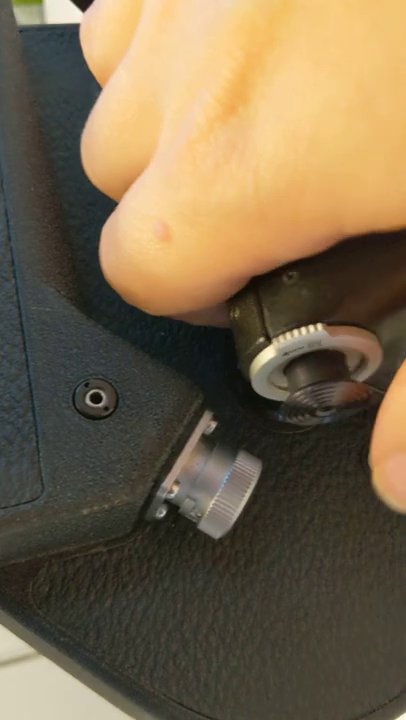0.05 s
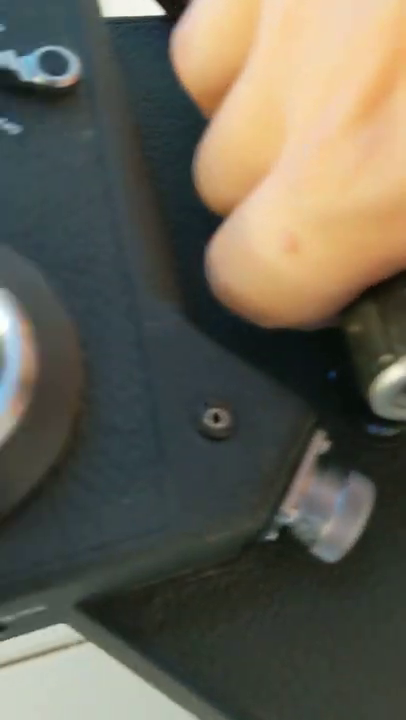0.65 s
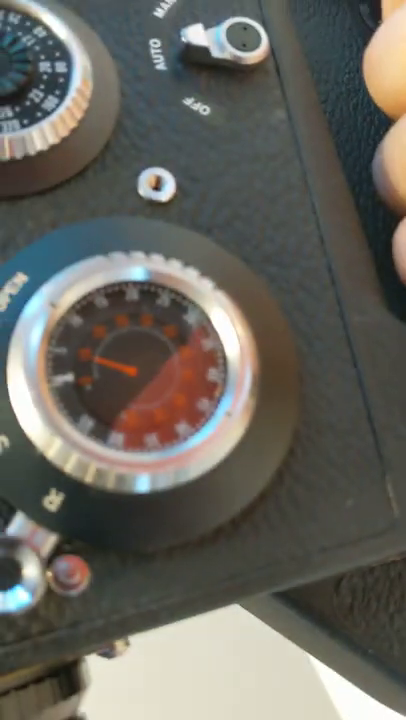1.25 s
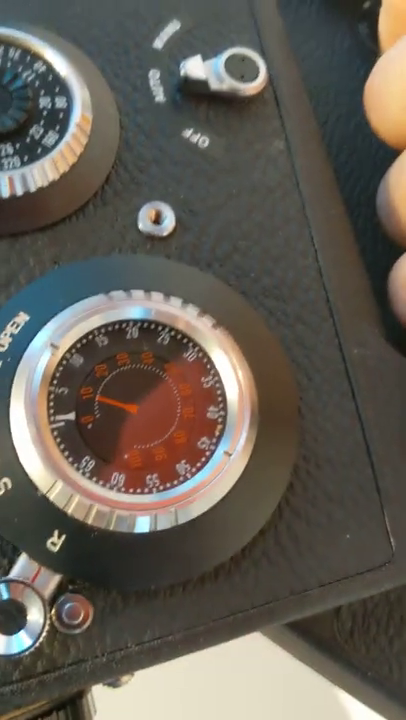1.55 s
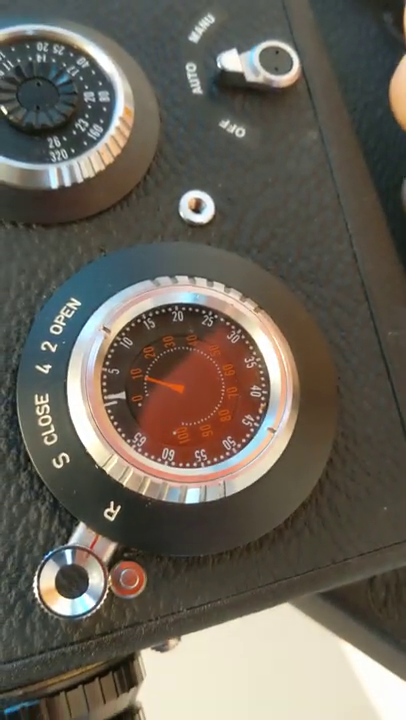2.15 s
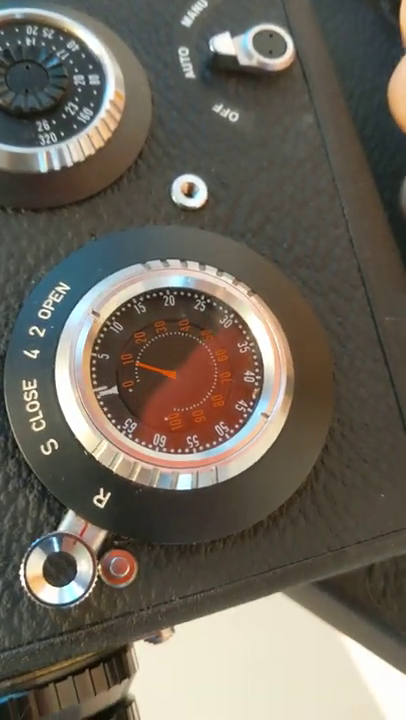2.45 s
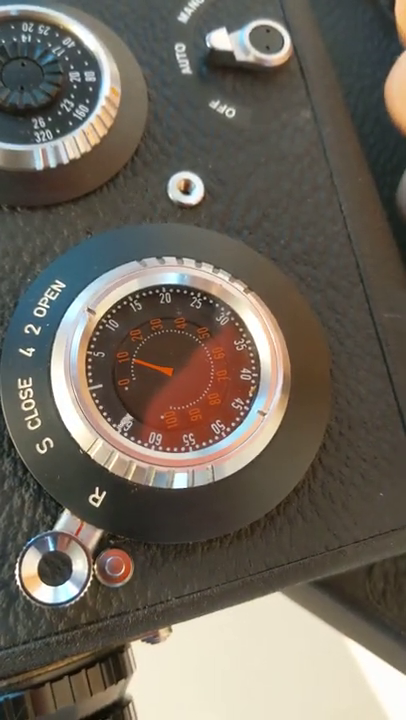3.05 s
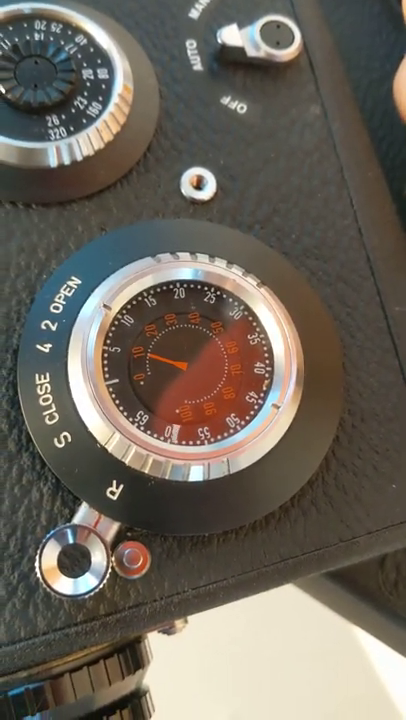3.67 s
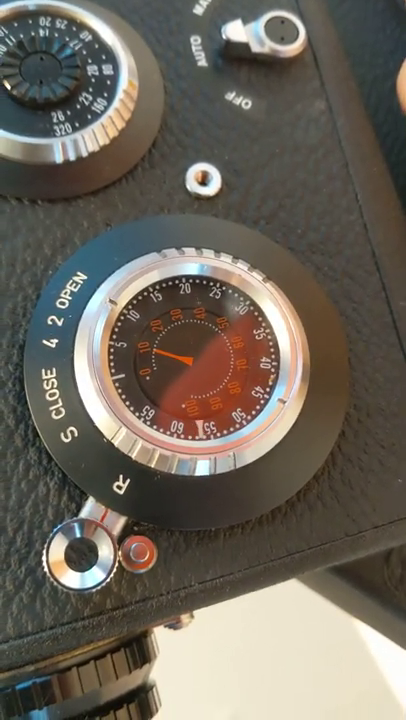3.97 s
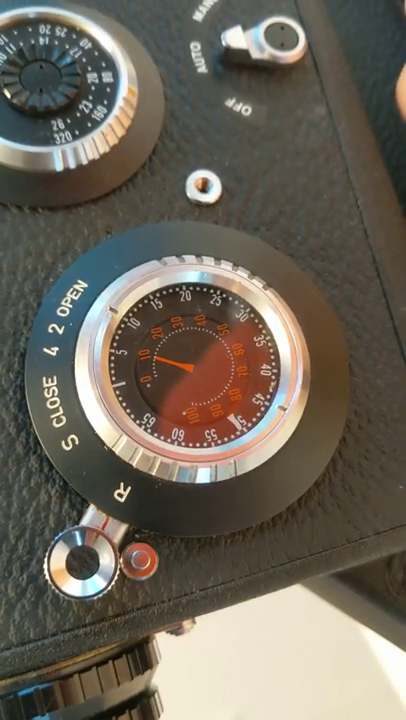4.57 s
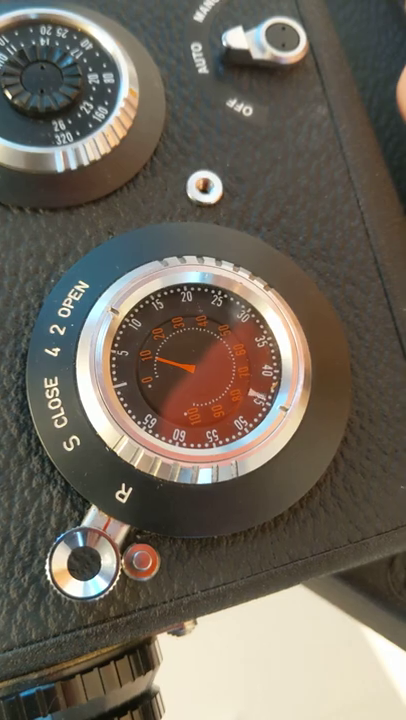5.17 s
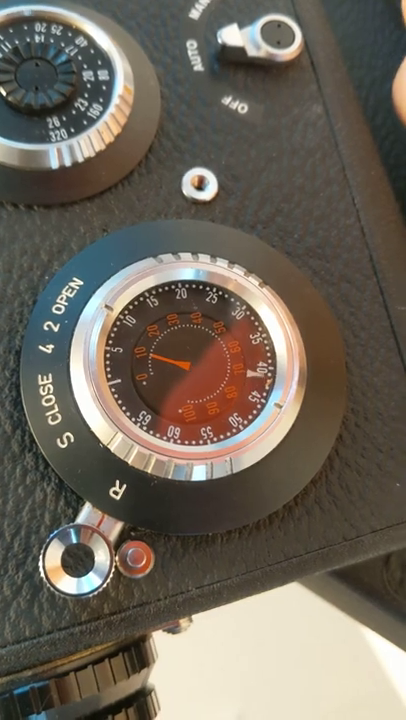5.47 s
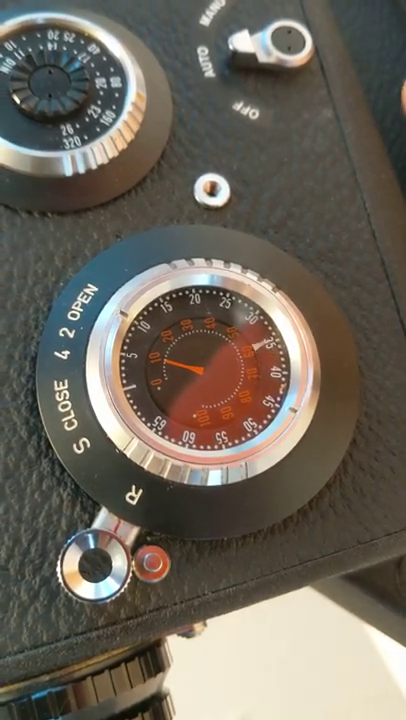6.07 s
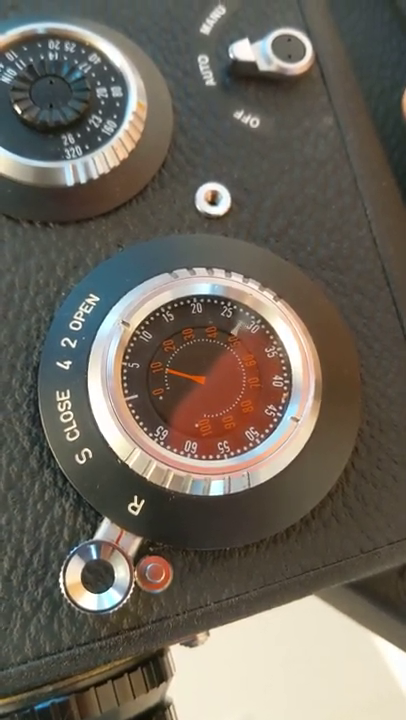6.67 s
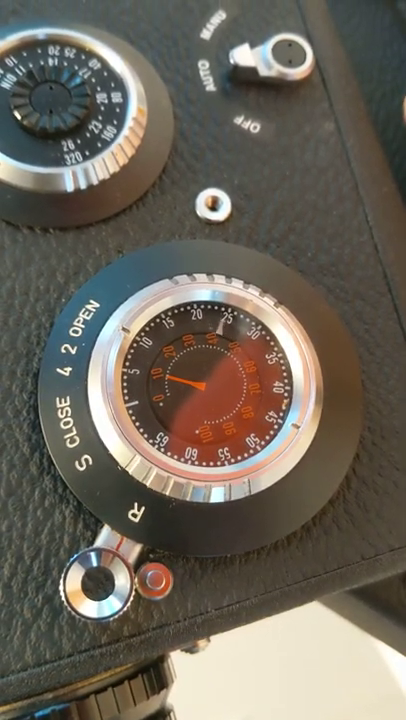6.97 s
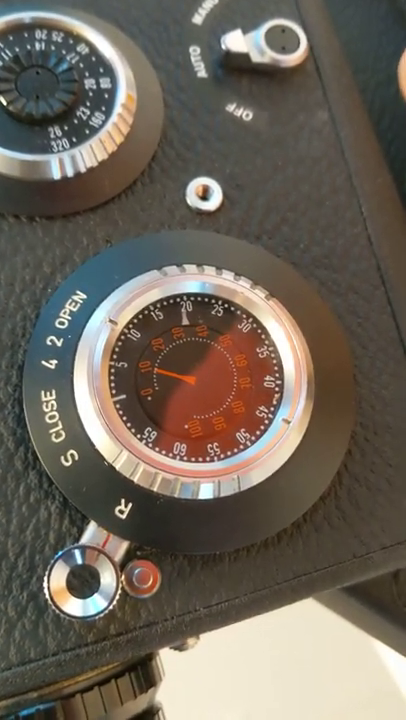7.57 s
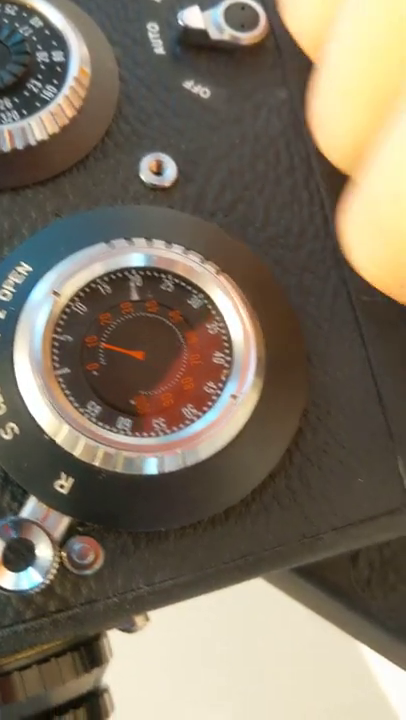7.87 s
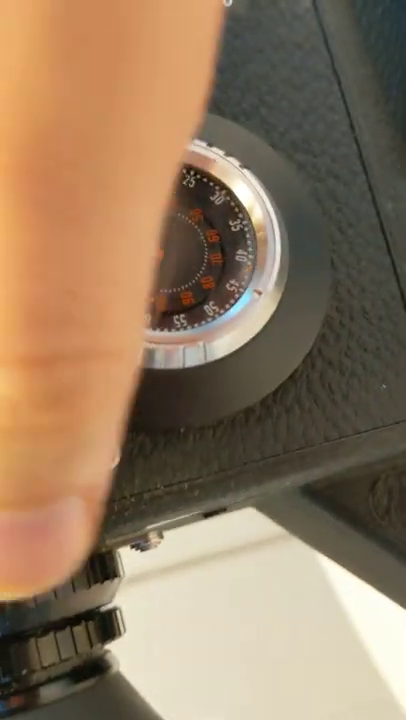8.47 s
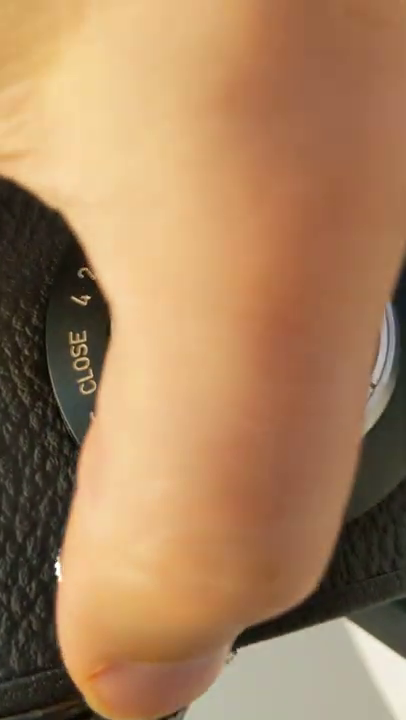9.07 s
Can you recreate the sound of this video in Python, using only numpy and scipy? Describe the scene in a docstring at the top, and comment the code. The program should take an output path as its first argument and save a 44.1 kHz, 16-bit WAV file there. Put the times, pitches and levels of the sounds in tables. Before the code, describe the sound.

A quiet room holds a low, steady hum, and a bird chirps faintly now and then during the first two seconds. Close by, a hand grips a small film camera, with light clicks around 0.5 seconds, tiny creaks and a soft slide of skin on leather. A few more finger clicks come just after 2 seconds. At about 2.4 seconds the motor starts, slightly softer at first, and quickly settles into a steady whir of rattling gears with bright, even ticks, about ten a second. Near 7.4 seconds the latch grazes the mechanism, and at 7.5 seconds it stops the motor with a sharp, briefly ringing click, the loudest sound, with a little room echo. Faint creaks and a soft rub of the hand follow around 8 seconds. The bird gives two faint chirps at about 9 seconds over the hum.

```python
"""A small film camera runs

In a quiet room with a low hum and a faint bird, a hand grips a camera and presses its trigger.
The motor whirs for five seconds: gears rattle the housing while the claw that pulls the film
ticks twice a turn, about ten turns a second, until the stop latch drops with a sharp click."""
import sys
import numpy as np
from scipy import signal
from scipy.fft import rfft, irfft
from scipy.io import wavfile
from scipy.ndimage import uniform_filter1d

SR = 44100
rng = np.random.default_rng(int(sys.argv[2]) if len(sys.argv) > 2 else 0)


def store_wav(level_fs):
    """Save 16-bit WAV to argv[1]."""
    pcm = np.round(np.clip(np.atleast_2d(level_fs), -1, 1) * 32767)
    wavfile.write(sys.argv[1], SR, pcm.T.astype(np.int16))


N = 411012
TIME = np.arange(N) / SR
START_S, STOP_S = 2.3785, 7.523  # the motor runs between these times
# ringing of the housing, plus the microphone's four treble peaks: f/Hz, width/Hz, boost/dB
HOUSING_AND_MIC_PEAKS = [(405.6, 38.6, 9.5), (480, 68, 9.5), (567, 45, 7), (1033, 120, 9.5), (1307, 99, 6),
                         (1512, 64, 7), (1764, 150, 8.5), (2045, 150, 8), (2347, 47, 9), (2413, 69, 9),
                         (2994, 324, 7.5), (3280, 143, 9.5), (3950, 72, 5.5), (4240, 280, 4),
                         (5540, 550, 4), (7670, 260, 10), (9460, 1100, 5.5), (11700, 590, 12)]


def amp(db):
    """Turns decibels into a factor to multiply by."""
    return 10 ** (np.asarray(db) / 20)


def unit(x):
    """Scales a sound to an average (rms) strength of 1."""
    return x / np.sqrt(np.mean(x ** 2) + 1e-20)


def curve_at(points, hz):
    """Reads between the points of a curve, on a log frequency scale."""
    f, value = np.transpose(points)
    return np.interp(np.log(hz + 1), np.log(f + 1), value)


def add(mix, s, sound):
    """Mixes a sound in at s seconds."""
    part = mix[round(s * SR):][:len(sound)]
    part += sound[:len(part)]


def ring(x, spectrum, peaks, size=16384):
    """Shapes x as a ringing object would: a broad tone colour with narrow peaks on top."""
    hz = np.fft.rfftfreq(size, 1 / SR)
    peaks_db = sum(boost / (1 + (2 * (hz - f) / width) ** 2) for f, width, boost in peaks)
    cepstrum = irfft(np.log(amp(curve_at(spectrum, hz) + peaks_db)))
    # fold the second half onto the first, so the ringing comes only after each push
    cepstrum[1:size // 2] *= 2
    cepstrum[size // 2 + 1:] = 0
    response = irfft(np.exp(rfft(cepstrum)))
    return signal.oaconvolve(x, response / np.linalg.norm(response))[:N]


def chatter(hits, rise_s):
    """The force of parts meeting: each hit is a burst of tiny bounces that dies away."""
    force, t = np.zeros(N), TIME[:SR // 10]
    for s, db, decay_s in hits:
        bounces = rng.choice([-1., 1.], len(t))
        add(force, s, amp(db) * bounces * (1 - np.exp(-t / rise_s)) * np.exp(-t / decay_s))
    return force


def background(noise_db=-58.09):
    """Steady low room noise and the mains hum of an appliance."""
    # tone colour of the room noise: f/Hz, relative level/dB
    noise_spectrum = [(20, -11), (32, -4), (44, -7.5), (70, -9), (100, -14), (170, -4.5), (270, -4.5),
                      (400, -3.5), (720, -20), (950, -20), (1550, -23), (2100, -32), (4200, -31),
                      (6600, -43), (15500, -44)]
    # its peaks and one dip: f/Hz, width/Hz, boost/dB
    noise_peaks = [(43, 9.7, 11), (226.7, 20, 6.5), (266, 25.5, 5.5), (412, 32, -2.5), (5780, 460, 8.5),
                   (7440, 980, 8), (9640, 950, 6.5), (11800, 600, 6)]
    # steady tones of the hum: f/Hz, rms level/dB
    hum_tones = [(120, -67.5), (899.5, -81.5)]
    hum = sum(amp(db) * np.sqrt(2) * np.sin(2 * np.pi * (hz * TIME + rng.random()))
              for hz, db in hum_tones)
    return amp(noise_db) * ring(rng.standard_normal(N), noise_spectrum, noise_peaks) + hum


def bird():
    """Short, mostly falling whistles; a quick waver of the pitch makes some of them raspy."""
    # chirps: t/s, length/s, first f/Hz, last f/Hz, relative level/dB, waver/share of the pitch
    chirps = [(.145, 0.031, 4750, 3500, -76, .01), (.252, .035, 4650, 3750, -81, .01),
              (0.583, 0.035, 4100, 4220, -69.5, .025), (0.613, 0.027, 3530, 3220, -68, .03),
              (1.21, 0.027, 5600, 5270, -73, .03), (1.254, .05, 3900, 3400, -73.5, 0.064),
              (1.553, .04, 6100, 5840, -80, .02), (1.61, 0.02, 4550, 3900, -79, .01),
              (1.652, 0.02, 4600, 3900, -78, .01), (2.024, 0.042, 5760, 3850, -70, 0.028),
              (8.999, 0.065, 4720, 3720, -71, 0.076), (9.048, 0.057, 3700, 3380, -70, 0.048)]
    out = np.zeros(N)
    for s, length, first_hz, last_hz, db, waver in chirps:
        count = int(length * SR)
        tremble = unit(uniform_filter1d(rng.standard_normal(count), size=50))
        hz = np.geomspace(first_hz, last_hz, count) * (1 + waver * tremble)
        whistle = np.sin(2 * np.pi * np.cumsum(hz) / SR)
        add(out, s, amp(db) * unit(whistle * signal.windows.tukey(count, .5)))
    return out


def creaks(length_s=0.025, width_hz=220):
    """The grip creaks in the hand: each brief run of tiny slips rings at one pitch."""
    # faint creaks: t/s, f/Hz, level/dB
    grip_creaks = [(0.316, 1250, -70), (.715, 2150, -77), (.808, 2020, -74), (7.688, 2200, -70.5),
                   (7.826, 2150, -76)]
    out, t = np.zeros(N), TIME[:int(length_s * SR)]
    for s, hz, db in grip_creaks:
        ringing = np.exp(-np.pi * width_hz * t) * np.sin(2 * np.pi * hz * t)
        slips = rng.standard_normal(len(t)) * np.hanning(len(t))
        add(out, s, amp(db) * unit(signal.fftconvolve(slips, ringing)[:len(t)]))
    return out


def fingers(grain_db=3):
    """Fingers click on the grip and trigger, and skin slides over leather in tiny, uneven slips."""
    # finger clicks: t/s, level/dB, decay/s
    touches = [(.507, -52, .002), (.5152, -48, 0.0025), (.5335, -46.5, 0.0055), (2.152, -51, 0.008),
               (2.174, -58.5, 0.014), (2.262, -46, 0.0026), (2.309, -46.5, 0.0018), (2.3785, -59, 0.0046)]
    # tone colour of a click: f/Hz, relative level/dB
    touch_spectrum = [(60, -13), (300, -10), (700, -1), (1500, -10), (2700, -12.5), (4000, -7), (6000, -16),
                      (10000, -17.5), (15000, -29)]
    # slides of the hand: t/s, length/s, level/dB
    slides = [(0.703, 0.37, -71.5), (7.927, 0.25, -77)]
    # tone colour of skin on leather: f/Hz, relative level/dB
    skin_spectrum = [(200, -17), (2000, -9), (4200, 5), (8000, -3), (15000, -9)]
    # low ringing of the grip, plus the microphone's four treble peaks: f/Hz, width/Hz, boost/dB
    grip_and_mic_peaks = [(686, 51, 11), (1230, 130, 5), (2080, 340, 6), (2820, 300, 8), (3380, 460, 6.5),
                          (5630, 850, 7), (7600, 370, 8.5), (9350, 900, 4.5), (11600, 600, 6)]
    friction = np.zeros(N)
    for s, length, db in slides:
        slips, sizes = rng.standard_normal((2, int(length * SR)))
        add(friction, s, amp(db) * unit(slips * amp(grain_db * sizes)) * np.hanning(len(slips)))
    clicks = ring(chatter(touches, rise_s=0.00071), touch_spectrum, grip_and_mic_peaks)
    return clicks + ring(friction, skin_spectrum, grip_and_mic_peaks)


def turn_starts(count=53, first_s=.1103, second_s=.096379, quicken_s=.0000527):
    """When each turn begins, plus the end of the last full one; each is shorter than the one before."""
    lengths = np.append(first_s, second_s - quicken_s * np.arange(count - 1))
    return START_S + np.append(0, np.cumsum(lengths))


def slowness(s, run_up_s):
    """1 as the motor starts, falling to 0 as it comes up to speed."""
    return np.exp(-np.maximum(s - START_S, 0) / run_up_s)


def gears(teeth=150, grain_db=2.5, repeat_share=0.39, rub_db=-3, base_db=-49, load_db=2.5):
    """Gear teeth knock and rub; some knocks come round with every turn, the rest are loose rattle."""
    # tone colour of the teeth: f/Hz, relative level/dB
    tooth_spectrum = [(60, -44), (150, -15.5), (300, -2.5), (520, 0.5), (700, -7.5), (1200, -2.5),
                      (1700, -16), (3000, -9.5), (5000, -16.5), (9800, -22.5), (10600, -27.5), (12500, -35),
                      (15700, -34)]
    starts = np.append(turn_starts(), STOP_S)
    running = (TIME > START_S) & (TIME < STOP_S)
    place, wear = rng.random(teeth), rng.standard_normal(teeth)
    pattern = np.zeros(N)
    for s, length in zip(starts, np.diff(starts)):
        pattern[np.round((s + place * length) * SR).astype(int)] = wear
    pattern /= pattern[running].std()
    loose = rng.standard_normal(N) * amp(grain_db * rng.standard_normal(N))
    loose *= rng.random(N) < 2500 / SR  # about 2500 knocks a second
    knocks = np.sqrt(repeat_share) * pattern + np.sqrt(1 - repeat_share) * unit(loose)
    force = knocks + amp(rub_db) * rng.standard_normal(N)
    force /= force[running].std()
    turns = np.interp(TIME, starts, np.arange(len(starts)))
    effort_db = base_db - 3.5 * slowness(TIME, run_up_s=0.35)  # softer at first
    effort_db += load_db * (1 - turns % 1)  # the claw loads the gears at each catch, then eases off
    return ring(running * amp(effort_db) * force, tooth_spectrum, HOUSING_AND_MIC_PEAKS)


def claw(catch_db=-41, release_db=-39.5, spread_db=2.5, catch_decay_s=0.0033, release_decay_s=0.0015):
    """Once a turn the claw catches the film, shakes its levers and snaps free with a brighter tick."""
    # softer knocks of the levers: t/s after the catch, level/dB relative to the catch, decay/s
    lever_knocks = [(.003, -9, 0.0028), (0.0225, -16, 0.0037), (.047, -11.5, 0.0056), (.0635, -11, .004),
                    (0.0721, -10.5, 0.0034)]
    # tone colour of the catch: f/Hz, relative level/dB
    catch_spectrum = [(60, -41), (500, -5), (1700, -8.5), (3000, -7.5), (3700, -4.5), (4500, 3), (5400, -6),
                      (6200, 3.5), (7200, -11), (9500, -5.5), (11300, -11.5), (12000, -4), (15000, -14)]
    # tone colour of the release: f/Hz, relative level/dB
    release_spectrum = [(60, -4), (1000, 2), (4000, -29), (6500, -14), (8600, 2), (10400, -11),
                        (11700, -4.5), (14400, -6), (15700, -7)]
    catches, releases = [], []
    for s in turn_starts()[:-1]:
        *knock_luck, catch_luck, release_luck = rng.standard_normal(len(lever_knocks) + 2)
        slow = slowness(s, run_up_s=0.11)
        db = catch_db - 5.5 * slow + .5 * catch_luck  # softer at first, and never quite even
        catches.append((s, db, catch_decay_s))
        for (lag_s, knock_db, decay_s), luck in zip(lever_knocks, knock_luck):
            catches.append((s + lag_s, db + knock_db + spread_db * luck, decay_s))
        release_s = s + 0.011 + 0.0076 * slow ** 2  # later while the motor is still slow
        releases.append((release_s, release_db + spread_db * release_luck, release_decay_s))
    catch_ticks = ring(chatter(catches, rise_s=0.00063), catch_spectrum, HOUSING_AND_MIC_PEAKS)
    release_ticks = ring(chatter(releases, rise_s=0.00088), release_spectrum, HOUSING_AND_MIC_PEAKS)
    return catch_ticks + release_ticks


def latch():
    """The latch grazes the last turn, blocks the drive and settles; its hardest blow rings the frame."""
    # blows of the latch: t/s, level/dB, decay/s
    blows = [(7.4305, -30.5, 0.0046), (7.4465, -40, 0.01), (7.5203, -16, 0.0018), (7.5915, -42, 0.0017)]
    # tone colour of a blow: f/Hz, relative level/dB
    blow_spectrum = [(60, -49.5), (300, -29), (480, 7), (750, 1), (1100, -7), (1550, 2.5), (2400, -6),
                     (3200, 8), (4000, 4), (4900, -3), (5850, 5.5), (6900, -1.5), (10500, -4), (12000, -2),
                     (15500, -17)]
    # tones of the camera's frame: f/Hz, level/dB, 60 dB fade time/s
    frame_tones = [(463, -44.5, 0.15), (690, -39, 0.027), (1030, -33.5, 0.045), (2053, -41.5, 0.078),
                   (3280, -32.5, .03), (11700, -32, 0.017)]
    out = ring(chatter(blows, rise_s=0.0011), blow_spectrum, peaks=[])
    t = TIME[:SR // 2]
    frame = sum(amp(db - 60 * t / fade_s) * np.sin(2 * np.pi * hz * t) for hz, db, fade_s in frame_tones)
    hardest_s = max(blows, key=lambda blow: blow[1])[0]
    add(out, hardest_s, frame)
    return out


def room(x, delay_s=0.0036, tails=3):
    """Each pitch echoes for its own time; several tails slowly crossfade to keep the echo smooth."""
    # how long the echo lasts: f/Hz, 60 dB fade time/s
    fade_times = [(200, 0.39), (1000, 0.31), (3200, 0.29), (6000, 0.36), (12000, 0.27)]
    out = np.zeros(N)
    for k in range(tails):
        hz, t, bands = signal.stft(rng.standard_normal(SR), SR, nperseg=256)
        fade = amp(-60 * t / curve_at(fade_times, hz)[:, None])
        tail = signal.istft(bands * fade, SR, nperseg=256)[1]
        tail[:int(delay_s * SR)] = 0
        crossfade = np.sqrt(2 / tails) * np.cos(np.pi * (TIME + k / tails))
        out += signal.oaconvolve(x * crossfade, tail / np.linalg.norm(tail))[:N]
    return out


def scene(bird_db=-2, motor_echo_db=-9, click_echo_db=-7.5, bird_echo_db=-7):
    """The camera and the bird are heard directly and with a little echo, over the room noise."""
    motor = gears() + claw()
    clicks = latch() + fingers() + creaks()
    song = bird()
    echo = room(amp(motor_echo_db) * motor + amp(click_echo_db) * clicks + amp(bird_echo_db) * song)
    return (motor + clicks + amp(bird_db) * song + echo + background())[None]


def record(dry):
    """Cuts off the highest treble, above 15950 Hz."""
    low_pass = signal.firwin(511, 15950, window=("kaiser", 9), fs=SR)
    return signal.oaconvolve(dry, low_pass[None], "same")


dry = scene()
out = record(dry)
store_wav(out)
```